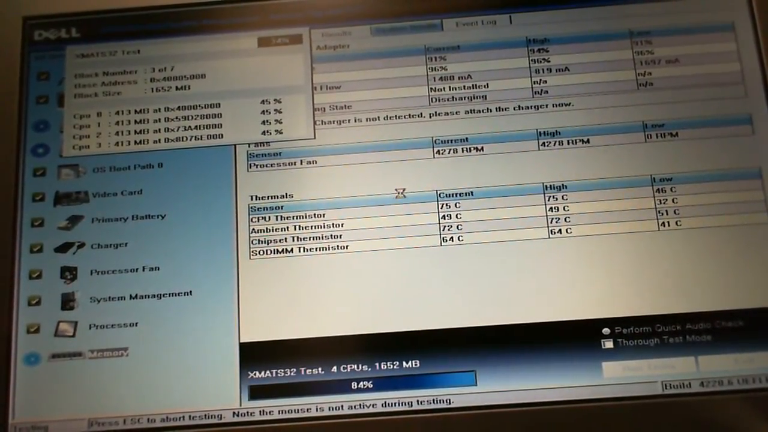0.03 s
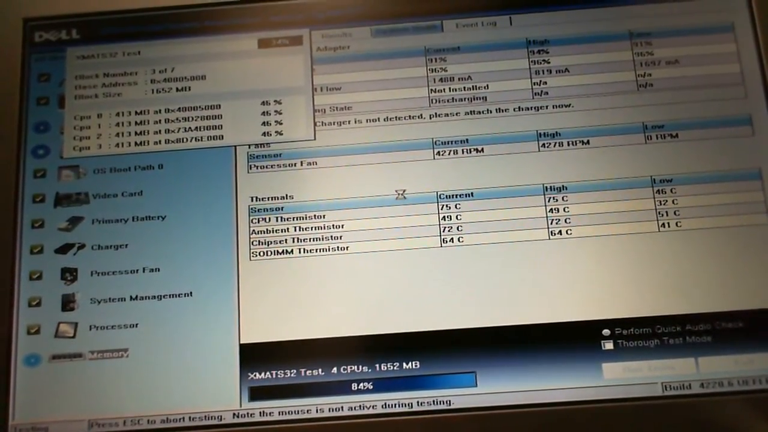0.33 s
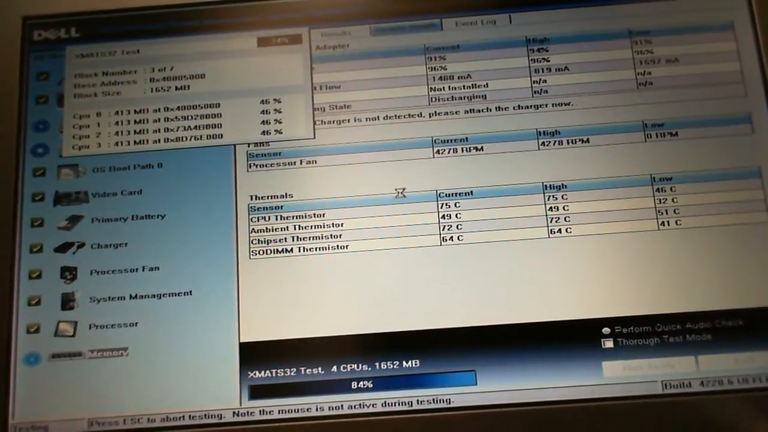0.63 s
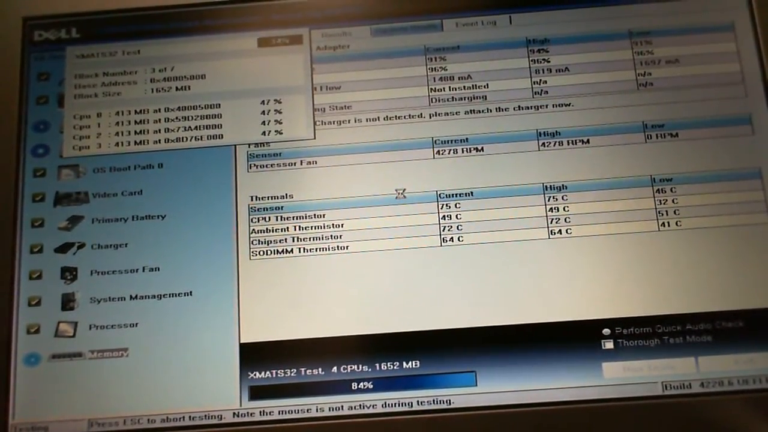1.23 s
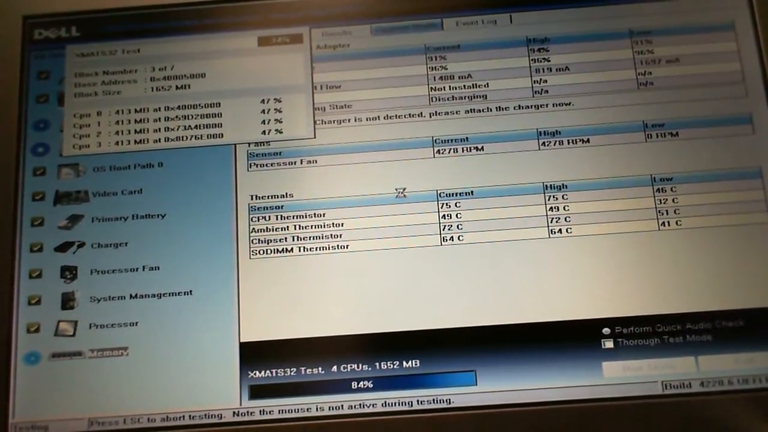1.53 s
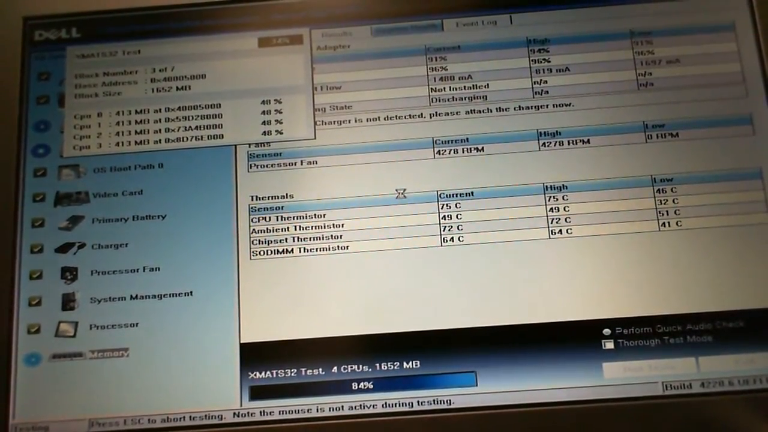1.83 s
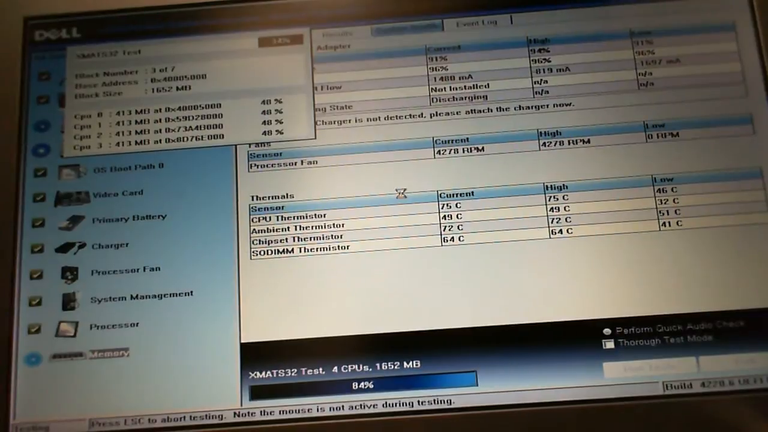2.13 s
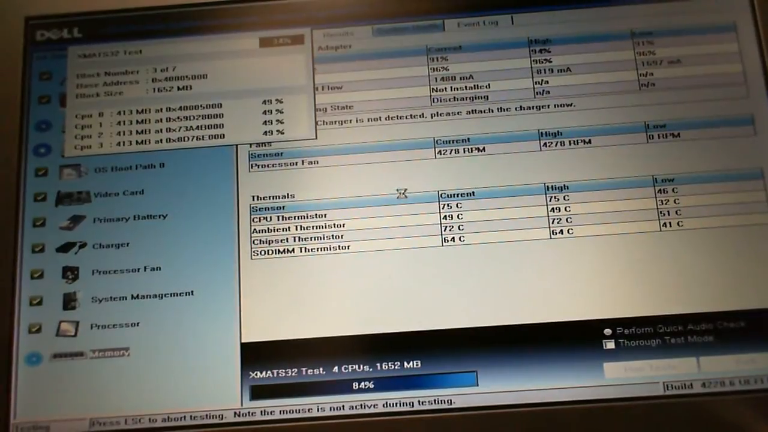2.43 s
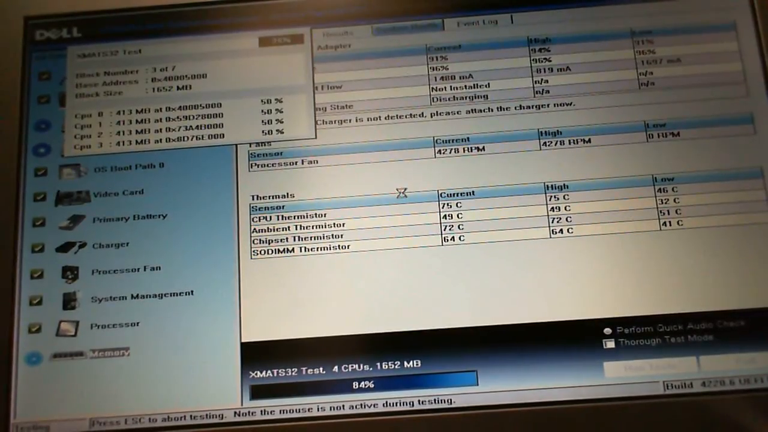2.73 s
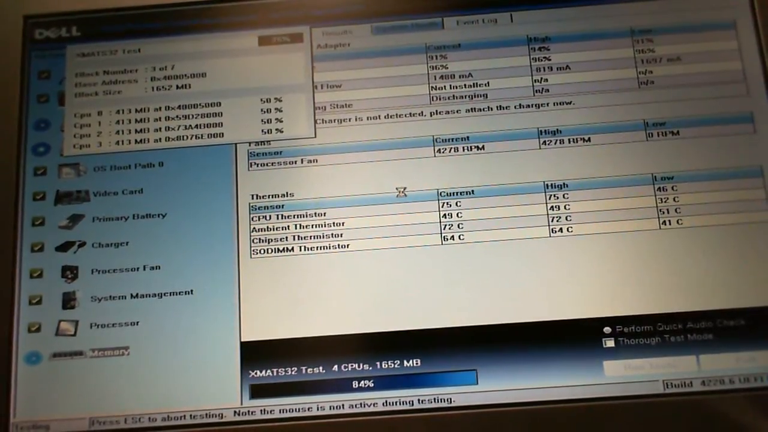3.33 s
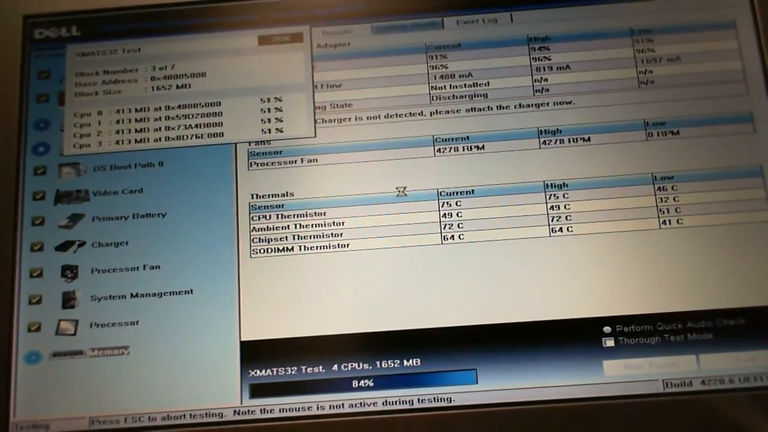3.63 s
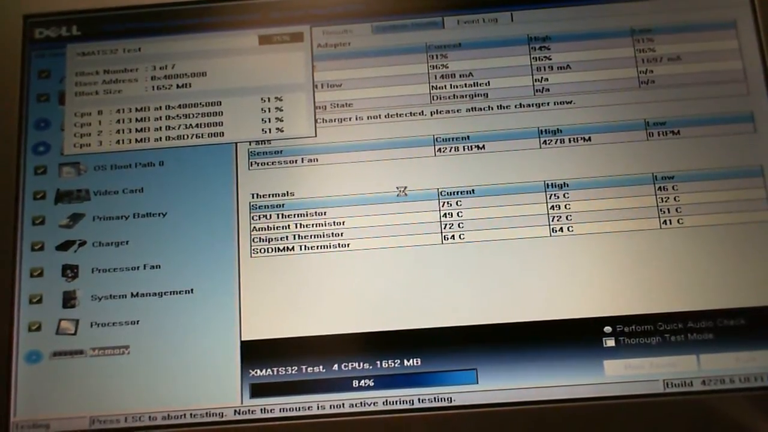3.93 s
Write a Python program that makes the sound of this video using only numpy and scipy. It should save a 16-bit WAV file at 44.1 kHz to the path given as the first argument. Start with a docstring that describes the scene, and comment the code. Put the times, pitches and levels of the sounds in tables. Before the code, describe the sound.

A laptop fan blows steadily from the start to the end at about 4 seconds, close to the microphone. Its even rush of air carries a constant whirring tone. A thin, very high electronic whine with a rapid flutter sits on top the whole time. Behind it are a faint electrical hum, a light hiss and the low rumble of a quiet room, gently swelling and sinking.

```python
"""Air rushes through the vent of a laptop under load, close to the microphone in a quiet room.
Two rotors hum on multiples of their turning speeds, and a thin electronic whine,
chopped thirty times a second, sits on top. Behind them are mains hum, weak motor tones,
the low rumble of the room and the microphone's own hiss."""
import sys
import numpy as np
from scipy import signal
from scipy.fft import rfft, irfft
from scipy.io import wavfile
from scipy.ndimage import uniform_filter1d

SR = 44100
rng = np.random.default_rng(int(sys.argv[2]) if len(sys.argv) > 2 else 0)


def wrap_up_sound(samples):
    """Save the sound to the file named by the first command line argument, as 16-bit audio."""
    columns = np.atleast_2d(samples).T
    # keep every value between -1 and 1, then stretch to whole-number steps
    tamed = np.clip(columns, -1, 1)
    steps = np.round(tamed * 32767).astype(np.int16)
    wavfile.write(sys.argv[1], SR, steps)


N = 176400

# spectrum of the air at the vent: frequency_hz, relative_db
AIR_SPECTRUM = [(100, -7.5), (200, -11.5), (420, -10), (660, -8), (780, -6.5), (970, -7), (1100, -5),
                (1320, -1), (1480, -4.5), (1640, -7), (1800, -11.5), (1980, -15.5), (2200, -12.5),
                (2500, -19), (3300, -18), (4100, -26.5), (5000, -25), (6000, -29), (7000, -27), (9000, -35),
                (16000, -50)]
# resonances of the case: centre_hz, width_hz, lift_db
CASE_RESONANCES = [(259, 17, 3.5), (486, 42, 4), (527, 33, 5), (571, 20, 4.5), (612, 53, -2.5),
                   (727, 43, 3), (837, 37, 4.5), (1178, 26, 4.5), (1280, 52, 2), (2600, 110, 2.5),
                   (2880, 130, -1), (3260, 130, -1)]
# tones of the fast rotor: multiple_of_speed, level_db
FAST_ROTOR_TONES = [(15, -42.7), (16, -54.5), (17, -61), (30, -70.5), (33, -69), (40, -71.5)]
# tones of the slow rotor: multiple_of_speed, level_db
SLOW_ROTOR_TONES = [(1, -47.5), (15, -51.3), (16, -61.5), (30, -63.5)]
# partials of the electronic whine: pitch_hz, level_db
WHINE_PARTIALS = [(6570.5, -70), (8000.3, -65.5), (9870.74, -48.5), (11300.6, -75), (11673.2, -78),
                  (13171, -70)]
# mains hum and weaker motor tones: pitch_hz, level_db
HUM_TONES = [(120.07, -56.3), (135.7, -61.5), (498.8, -62), (564.9, -65), (2055.2, -58.7), (3891.1, -66.7),
             (4108, -75)]
# spectrum of the room rumble: frequency_hz, relative_db
RUMBLE_SPECTRUM = [(8, 0), (30, 0), (48, -1), (82, 1.3), (95, -8.5), (130, -11), (170, -17), (400, -35)]
# slow swell of the room rumble: time_s, lift_db
RUMBLE_SWELL_CURVE = [(0, 3), (.6, -1), (1.3, -1.5), (1.8, 3), (2.2, -3), (2.65, 2.5), (3.2, -2), (4, -0.5)]
# spectrum of the microphone hiss: frequency_hz, relative_db
HISS_SPECTRUM = [(100, -6), (4000, -1.5), (8500, -4), (9900, -0.8), (11000, -3), (13000, -2.3), (15600, 0)]


def vent_air(level_db=-38, patch_db=0.15, patch_s=.08, patch_hz=300):
    """Turbulent air close to the vent, coloured by the case, swelling faintly in small patches."""
    air = coloured_noise(AIR_SPECTRUM, CASE_RESONANCES)
    hz, t, spectrogram = signal.stft(air, SR, nperseg=1024)
    patches = rng.standard_normal(spectrogram.shape)
    patches = uniform_filter1d(patches, round(patch_hz / hz[1]), axis=0)
    patches = unit_rms(uniform_filter1d(patches, round(patch_s / t[1]), axis=1))
    _, air = signal.istft(spectrogram * gain_of(patch_db * patches), SR, nperseg=1024)
    return gain_of(level_db) * unit_rms(air[:N])


def rotor(tones, speed_hz, wander):
    """Tones locked to one shaft; the fifteenth multiple, likely the blades passing, stands out."""
    turns = wandering_turns(speed_hz, wander)
    return sum(fluttering_tone(multiple * turns, db) for multiple, db in tones)


def electronic_whine(chop_hz=30, start_s=0.0103, burst_s=0.028, edge_s=.001, sharp_hz=6):
    """High electronic partials that all cut out briefly at a regular rate."""
    t = np.arange(N) / SR
    age_s = (t - start_s) % (1 / chop_hz)
    gate = np.clip(np.minimum(age_s, burst_s - age_s) / edge_s, 0, 1)
    extra_turns = sharp_hz * age_s  # the whine runs slightly sharp within each burst
    return gate * sum(sine(hz * t + extra_turns, db) for hz, db in WHINE_PARTIALS)


def mains_and_motor_hum():
    """Steady mains and motor tones, each wavering on its own."""
    return sum(fluttering_tone(wandering_turns(hz, wander=.0002), db) for hz, db in HUM_TONES)


def room_rumble(base_db=-45.8):
    """Low noise of the room behind the laptop, slowly swelling and sinking."""
    swell_db = np.interp(np.arange(N) / SR, *np.transpose(RUMBLE_SWELL_CURVE))
    return gain_of(base_db + swell_db) * coloured_noise(RUMBLE_SPECTRUM)


def coloured_noise(spectrum, resonances=()):
    """Noise of rms 1 with a broad spectrum and narrow resonances."""
    hz = np.fft.rfftfreq(N, 1 / SR)
    point_hz, point_db = np.transpose(spectrum)
    broad_db = np.interp(np.log(hz + 1), np.log(point_hz + 1), point_db)
    narrow_db = sum(lift / (1 + (2 * (hz - centre) / width) ** 2) for centre, width, lift in resonances)
    white = rfft(rng.standard_normal(N))
    return unit_rms(irfft(white * gain_of(broad_db + narrow_db), N))


def wandering_turns(hz, wander):
    """Turns made at a wandering speed; wander is the rms share by which it strays."""
    return np.cumsum(hz * (1 + wander * drift(rate_hz=2.474))) / SR


def fluttering_tone(turns, level_db, flutter_db=0.9):
    """A sine whose level flutters a little."""
    return sine(turns, level_db + flutter_db * drift(rate_hz=8))


def sine(turns, level_db):
    """A sine of the given rms level, starting at a random phase."""
    return np.sqrt(2) * gain_of(level_db) * np.sin(2 * np.pi * (turns + rng.random()))


def drift(rate_hz):
    """Slow random motion of rms 1, up to the given rate."""
    t = np.linspace(0, N / SR, num=1000)
    rates_hz = np.geomspace(rate_hz / 10, rate_hz, 16)
    motion = sum(np.sin(2 * np.pi * (hz * t + rng.random())) / np.sqrt(hz) for hz in rates_hz)
    return np.interp(np.arange(N) / SR, t, unit_rms(motion))


def gain_of(db):
    """Decibels to gain."""
    return 10 ** (np.asarray(db) / 20)


def unit_rms(x):
    """Scales to rms 1."""
    return x / np.sqrt(np.mean(x ** 2) + 1e-20)


def scene():
    """The laptop close up, over the rumble of the room, in mono."""
    fast_rotor = rotor(FAST_ROTOR_TONES, speed_hz=90.392, wander=0.00012)
    slow_rotor = rotor(SLOW_ROTOR_TONES, speed_hz=58.12, wander=0.00036)
    cooling = vent_air() + fast_rotor + slow_rotor
    return (cooling + mains_and_motor_hum() + electronic_whine() + room_rumble())[None]


def record(dry, hiss_db=-49, cutoff_hz=15750, dc_offset=-.0442):
    """The microphone adds its hiss, loses the highest treble and carries a constant offset."""
    hiss = gain_of(hiss_db) * coloured_noise(HISS_SPECTRUM)
    low_pass = signal.firwin(1023, cutoff_hz, window=("kaiser", 9), fs=SR)
    return dc_offset + signal.oaconvolve(dry + hiss, low_pass[None], "same")


dry = scene()
out = record(dry)
wrap_up_sound(out)
```